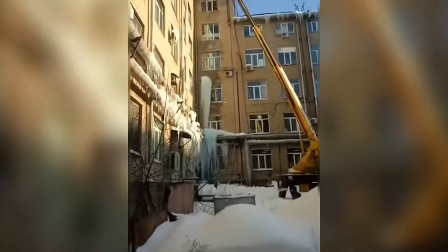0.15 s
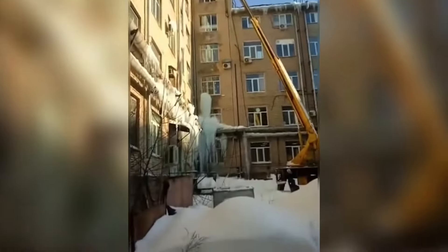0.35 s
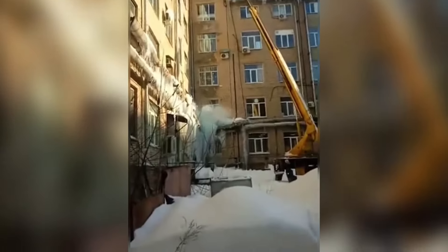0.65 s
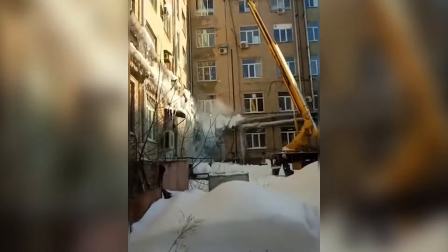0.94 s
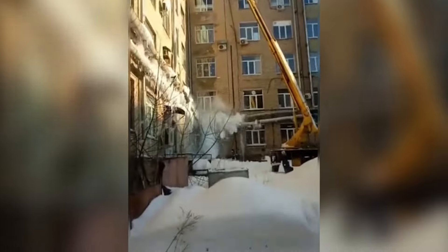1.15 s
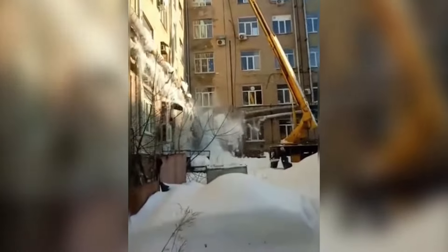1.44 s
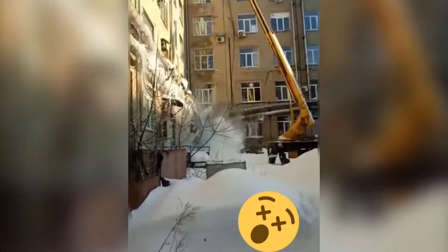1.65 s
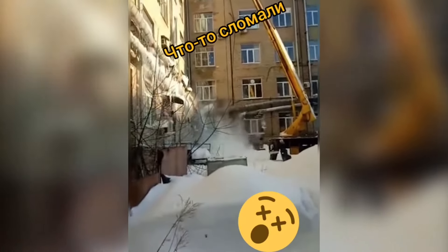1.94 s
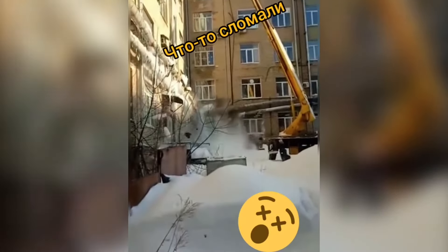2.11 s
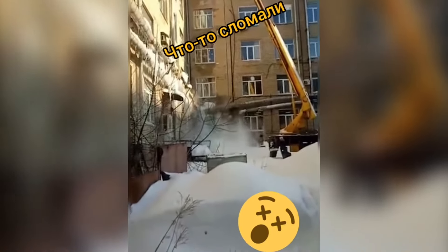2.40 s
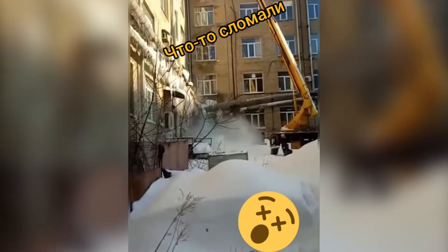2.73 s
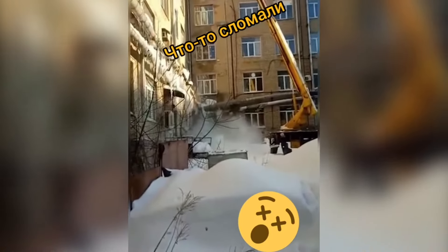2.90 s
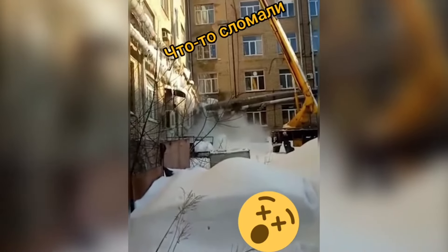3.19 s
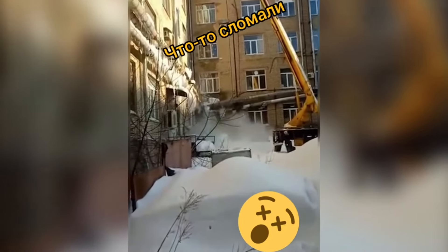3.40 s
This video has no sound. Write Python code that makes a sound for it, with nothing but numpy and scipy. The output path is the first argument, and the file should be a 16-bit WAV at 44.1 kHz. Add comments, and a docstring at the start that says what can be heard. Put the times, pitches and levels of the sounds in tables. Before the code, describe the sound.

Falling ice crashes into a courtyard, rumbling and shattering before it starts to settle.

```python
"""A crane truck idles far off as a huge column of ice drops from a building into a snowy courtyard.
A few slabs crack first, then heavy blocks thud into the heap and ever smaller chunks tumble.
Most slabs burst later, as the heap spreads: plates clatter, and shards and fine powder spray out.
After about three seconds the heap settles. All along, the house fronts throw the crash back."""
import sys
import numpy as np
from scipy import signal
from scipy.fft import rfft, irfft, next_fast_len
from scipy.io import wavfile
from scipy.ndimage import uniform_filter1d, minimum_filter1d

SR = 44100
rng = np.random.default_rng(int(sys.argv[2]) if len(sys.argv) > 2 else 0)


def master(y):
    """Save y as 16-bit WAV."""
    cut = np.clip(np.atleast_2d(y).T, -1, 1)
    pcm = np.round(cut * 32767)  # scale
    wavfile.write(sys.argv[1], SR, pcm.astype(np.int16))


N = 156555
T = np.arange(N) / SR


def from_db(db):
    """Turn decibels into a factor to multiply by."""
    return 10 ** (np.asarray(db) / 20)


def unit_power(x):
    """Scale a signal to an average power of 1."""
    return x / np.sqrt(np.mean(x ** 2) + 1e-20)


def level(rows):
    """A volume curve through (seconds, dB) points, silent before the first."""
    return from_db(np.interp(T, *np.transpose(rows), left=-120))


def drift(hz):
    """A smooth random wobble, about 1 in size; more hz makes it faster."""
    step = 40  # samples between random values
    pole = np.exp(-2 * np.pi * hz * step / SR)
    noise = rng.standard_normal(N // step + 2002)
    slow = signal.lfilter([1], [1, -2 * pole, pole * pole], noise)[2000:]
    return np.interp(np.arange(N) / step, np.arange(len(slow)), unit_power(slow))


def colour(x, tone):
    """Shape bass and treble along (Hz, dB) points, then scale to a power of 1."""
    size = 2 * next_fast_len(N)
    hz, db = np.transpose(tone)
    log_hz = np.log(np.fft.rfftfreq(size, 1 / SR) + 1)
    gain = from_db(np.interp(log_hz, np.log(hz), db))
    # build the filter so that nothing rings before its hit
    cepstrum = irfft(np.log(gain))[:size // 2]
    cepstrum[1:] *= 2
    response = np.exp(rfft(cepstrum, size))
    return unit_power(irfft(rfft(x, size) * response)[:N])


def low_pass(x, hz):
    """Gently dull the treble above hz."""
    return signal.sosfilt(signal.butter(2, hz, fs=SR, output="sos"), x)


def ring(clicks, hz, cycles):
    """Each click rings as a pure tone that fades by 60 dB in so many cycles."""
    angle = 2 * np.pi * hz / SR
    fade = np.exp(-np.log(1000) * hz / (cycles * SR))
    return signal.lfilter([0, np.sin(angle)], [1, -2 * fade * np.cos(angle), fade ** 2], clicks + 1e-18)


def debris(tone, low_hz, high_hz, per_s, cycles, spread_db, crush_db, clump_hz, clump_db=0):
    """Pieces of many pitches knock together over the hiss of crushed ice; clump_db adds surges."""
    sizes = from_db(spread_db * np.minimum(rng.exponential(1, N), 4))
    signs = rng.choice([-1, 1], N)
    clicks = sizes * signs * (rng.random(N) < per_s / SR)
    pitches = np.geomspace(low_hz, high_hz, 28)
    which_pitch = rng.integers(0, len(pitches), N)
    knocks = sum(np.sqrt(hz) * unit_power(ring(clicks * (which_pitch == k), hz, cycles))
                 for k, hz in enumerate(pitches))
    hiss = from_db(crush_db) * colour(rng.standard_normal(N), tone)
    surges = from_db(clump_db * drift(clump_hz))
    return unit_power((colour(knocks, tone) + hiss) * surges)


def burst(start, decay_s, rise_s=0.0089):
    """The volume of a spray of pieces: it jumps up, then dies away."""
    age = np.maximum(T - start, 0)
    return np.minimum(age / rise_s, 1) * np.exp(-np.maximum(age - rise_s, 0) / decay_s)


# The town's steady noise. Each row: frequency in Hz, relative level in dB.
TOWN_TONE = [(20, -17), (45, -3), (105, -1.5), (180, -9.5), (350, -10.5), (700, -12.5), (1100, -19.5),
             (1400, -34), (2000, -30.5), (2800, -45.5), (6000, -56), (15000, -72.5)]

def background():
    """The idling truck hums, wavering in pitch, under the noise of the town."""
    idle_hz = 105.5 * (1 + 0.036 * drift(9))
    hum = np.sqrt(2) * np.sin(2 * np.pi * np.cumsum(idle_hz) / SR)
    town = colour(rng.standard_normal(N), TOWN_TONE)
    return from_db(-39) * town + from_db(-50) * hum


# Echoes off the house fronts. Each row: delay in seconds, relative level in dB.
WALL_ECHOES = [(.037, -16), (.083, -17), (.141, -14)]

def courtyard(sound, tail_s=0.88):
    """The walls send back a few dull echoes and a wash that fades by 60 dB in tail_s."""
    tail = rng.standard_normal(N) * np.exp(-np.log(1000) * T / tail_s)
    tail *= T > WALL_ECHOES[0][0]  # silent until the first echo
    response = from_db(-13) * tail / np.linalg.norm(tail)
    for delay, db in WALL_ECHOES:
        response[int(delay * SR)] += from_db(db)
    return low_pass(signal.fftconvolve(sound, response)[:N], hz=4480)


# Slabs bursting. Each row: start in seconds, shard level in dB, plate level in dB, decay in seconds.
SLAB_BURSTS = [(0.161, -35.5, -33.5, 0.044), (0.196, -29.5, -43, 0.021), (.25, -39, -32, 0.033),
               (0.369, -31.5, -23, .025), (1.364, -37, -25, 0.019), (1.43, -36, -24, .015),
               (1.5, -22, -24, 0.025), (1.738, -23.5, -24, 0.033), (1.908, -20, -24, 0.028),
               (1.975, -28.5, -23, .015), (2.017, -23.5, -28, 0.0092), (2.124, -26, -20.5, 0.032),
               (2.308, -21, -25, 0.027), (2.358, -22.5, -25.5, 0.042), (2.553, -29, -19, 0.022),
               (2.59, -27, -20.5, 0.036), (2.639, -26.5, -23.5, 0.029), (2.76, -30, -24, 0.043),
               (3.085, -33, -25, 0.019), (3.247, -37, -26.5, 0.035), (3.368, -37.5, -28.5, 0.018),
               (3.446, -39, -26.5, 0.015), (3.516, -36.5, -24, 0.015)]

def slab_bursts():
    """Each slab throws out a spray: extra power for plates and shards, a power factor for powder."""
    plate_surge, shard_surge, powder_boost = np.zeros(N), np.zeros(N), np.ones(N)
    for start, shard_db, plate_db, decay_s in SLAB_BURSTS:
        spray = burst(start, decay_s)
        plate_surge += (from_db(plate_db) * spray) ** 2
        shard_surge += (from_db(shard_db) * spray) ** 2
        powder_boost += (from_db(6.5) * spray) ** 2
    return plate_surge, shard_surge, powder_boost


# How much powder flies. Each row: time in seconds, relative level in dB.
POWDER_LEVELS = [(.15, -73), (.27, -53), (.5, -54.5), (1.2, -47.5), (1.9, -43), (2.4, -45.5), (2.78, -52),
                 (2.9, -58), (3.55, -65.5)]
# Its fizz. Each row: frequency in Hz, relative level in dB.
POWDER_COLOUR = [(4000, -30.5), (5500, -1), (6500, -7), (7300, -16), (8300, -26), (10800, -24),
                 (11600, -41.5), (12600, -17.5), (13500, -13.5), (14200, -6), (14800, 2), (15600, -10)]

def powder(boost):
    """The finest splinters fizz, thickest while the heap spreads."""
    fizz = debris(POWDER_COLOUR, low_hz=5500, high_hz=15500, per_s=5000, cycles=87,
                  spread_db=-0.5, crush_db=0.5, clump_hz=19, clump_db=1)
    return fizz * level(POWDER_LEVELS) * np.sqrt(boost)


# How many shards fly. Each row: time in seconds, relative level in dB.
SHARD_LEVELS = [(.15, -61), (.22, -31.5), (.38, -34), (.56, -36.5), (.9, -32.5), (1.45, -32), (1.6, -27),
                (1.7, -34), (1.8, -30.5), (2.08, -28), (2.28, -30.5), (2.38, -26.5), (2.5, -35.5),
                (2.77, -32), (2.88, -35.5), (3.55, -41.5)]
# Their tinkle. Each row: frequency in Hz, relative level in dB.
SHARD_COLOUR = [(1500, -45.5), (2200, -7.5), (2550, -2), (2850, -3.5), (3250, 1.5), (3800, -1.5),
                (4300, -5), (4650, -8), (5100, -5), (5550, -11.5), (5850, -29), (6300, -19.5), (7000, -43),
                (8000, -52), (11700, -65.5)]

def shards(surge):
    """Small shards ring high as they hit, loudest where a slab bursts."""
    tinkle = debris(SHARD_COLOUR, low_hz=2100, high_hz=6480, per_s=2800, cycles=35,
                    spread_db=2.5, crush_db=-1.5, clump_hz=55, clump_db=-0.26)
    return tinkle * np.sqrt(level(SHARD_LEVELS) ** 2 + surge)


# How many plates fall. Each row: time in seconds, relative level in dB.
PLATE_LEVELS = [(.15, -54), (.21, -25.5), (.37, -28.5), (.52, -29), (1.13, -25), (1.46, -26.5), (1.55, -23),
                (1.7, -26), (1.95, -23), (2.27, -25.5), (2.38, -21), (2.5, -27), (2.62, -26.5),
                (2.95, -27.5), (3.2, -34), (3.55, -33)]
# Their clatter. Each row: frequency in Hz, relative level in dB.
PLATE_COLOUR = [(500, -41.5), (850, 4.5), (1020, 2.5), (1200, -7), (1450, -3), (1750, 2), (1980, -2),
                (2150, -9.5), (2450, -7.5), (2900, -17), (5000, -74.5)]

def plates(surge):
    """Flat pieces clatter against each other, louder where a slab bursts."""
    clatter = debris(PLATE_COLOUR, low_hz=770, high_hz=2890, per_s=1500, cycles=14,
                     spread_db=2, crush_db=0.5, clump_hz=10, clump_db=0.9)
    return clatter * np.sqrt(level(PLATE_LEVELS) ** 2 + surge)


# How many chunks tumble. Each row: time in seconds, relative level in dB.
CHUNK_LEVELS = [(.14, -48), (.24, -19), (.4, -14.5), (.6, -16.5), (.88, -14.5), (1.12, -14.5), (1.35, -15),
                (1.55, -15.5), (1.78, -16), (1.9, -17), (2.28, -19.5), (2.48, -19.5), (2.75, -20),
                (3.09, -20), (3.15, -26), (3.55, -28)]
# Their knocking. Each row: frequency in Hz, relative level in dB.
CHUNK_COLOUR = [(100, -53), (170, -10), (230, -1), (310, 0.5), (390, -3.5), (500, -3), (640, -4.5),
                (780, -9), (940, -14), (1130, -21), (1400, -18), (2500, -81.5)]
# Smaller chunks sound brighter. Each row: time in seconds, boost of highs over lows in dB.
CHUNK_BRIGHTNESS = [(.3, -1), (1.2, -3.5), (1.8, 2), (3.2, 3)]
# Chunks landing hard. Each row: start in seconds, relative level in dB.
HARD_LANDINGS = [(0.253, -20), (.392, -22), (1.029, -27), (1.279, -36), (1.76, -20), (2.471, -18),
                 (3.252, -28)]

def chunks():
    """Chunks tumble over each other and get smaller; a few land with a hard knock."""
    tumble = debris(CHUNK_COLOUR, low_hz=168, high_hz=1303, per_s=1500, cycles=5.4,
                    spread_db=1.5, crush_db=-5, clump_hz=11)
    lows = signal.sosfiltfilt(signal.butter(2, 570, fs=SR, output="sos"), tumble)  # below 570 Hz
    highs = tumble - lows
    tilt = from_db(np.interp(T, *np.transpose(CHUNK_BRIGHTNESS)) / 2)
    landings = sum(from_db(db) * burst(start, decay_s=0.015) for start, db in HARD_LANDINGS)
    return (lows / tilt + highs * tilt) * level(CHUNK_LEVELS) + unit_power(highs) * landings


# How many blocks roll. Each row: time in seconds, relative level in dB.
BLOCK_LEVELS = [(.17, -47.5), (.25, -19), (.35, -13.5), (.47, -15), (.78, -18.5), (.87, -21), (1.0, -17),
                (1.25, -25), (1.46, -21), (1.7, -25.5), (2.4, -24), (2.75, -29), (3.1, -30), (3.55, -40)]
# Their rumble. Each row: frequency in Hz, relative level in dB.
BLOCK_COLOUR = [(15, -42.5), (25, -31.5), (38, -22), (52, -14), (80, -6.5), (120, 1.5), (190, 3), (235, -6),
                (330, -38), (600, -77.5)]

def blocks():
    """Heavy blocks roll over each other with a deep rumble."""
    rumble = debris(BLOCK_COLOUR, low_hz=28, high_hz=344, per_s=700, cycles=6.4,
                    spread_db=2.5, crush_db=-8, clump_hz=27)
    return rumble * level(BLOCK_LEVELS)


# Big blocks landing. Each row: start in seconds, relative level in dB, pitch in Hz.
BLOCK_LANDINGS = [(.305, -11.5, 82), (0.314, -10.5, 125.5), (0.355, -8, 120), (0.424, -16.5, 240),
                  (0.523, -6.5, 159.7), (.702, -5, 150), (.94, -8.5, 109.4), (0.943, -5.5, 277),
                  (0.996, -9, 185), (1.189, -10, 292), (1.46, -24.5, 91), (1.825, -22, 83.5),
                  (1.864, -15.5, 126), (2.187, -14, 187), (2.215, -21.5, 80), (2.586, -24, 75),
                  (3.055, -15, 278), (3.08, -18, 220)]

def thuds(cycles=6.2):
    """Each big block crushes into the heap: a short boom that swells and dies within a few cycles."""
    booms = np.zeros(N)
    for start, db, hz in BLOCK_LANDINGS:
        click = signal.unit_impulse(N, int(start * SR))
        boom = ring(ring(click, hz, cycles), hz, cycles)  # ringing twice softens the start
        booms += from_db(db) * boom / np.abs(boom).max()
    return low_pass(booms, hz=715)


def scene():
    """The crashing ice, its echoes and the background, in one channel."""
    plate_surge, shard_surge, powder_boost = slab_bursts()
    heavy_ice = blocks() + chunks() + thuds()
    splinters = plates(plate_surge) + shards(shard_surge) + powder(powder_boost)
    crash = from_db(-2.5) * (heavy_ice + splinters)
    return (crash + courtyard(crash) + background())[None]


def record(dry, lowest_hz=32.2, highest_hz=15720, peak_limit=0.68):
    """The microphone loses the deepest bass, loud peaks are turned down, the top treble is cut."""
    heard = signal.sosfilt(signal.butter(4, lowest_hz, "high", fs=SR, output="sos"), dry)
    peak = -minimum_filter1d(-np.abs(heard), size=400)  # the largest swing within about 9 ms
    gain = uniform_filter1d(np.minimum(1, peak_limit / (peak + 1e-9)), size=400)
    treble_cut = signal.ellip(12, .1, 100, highest_hz, fs=SR, output="sos")
    return signal.sosfilt(treble_cut, heard * gain)


dry = scene()
out = record(dry)
master(out)
```